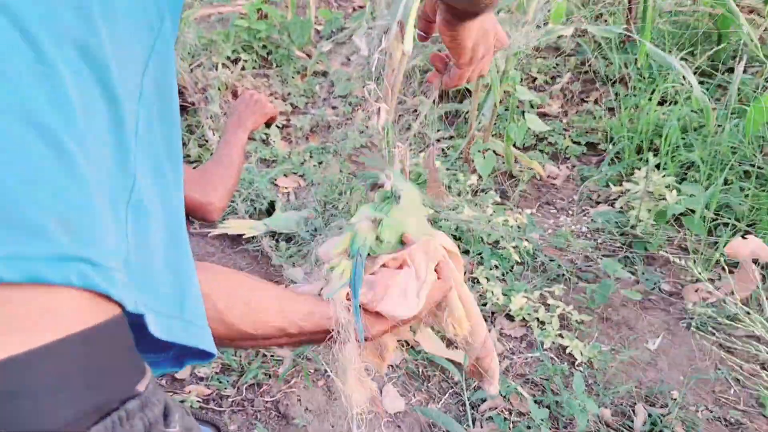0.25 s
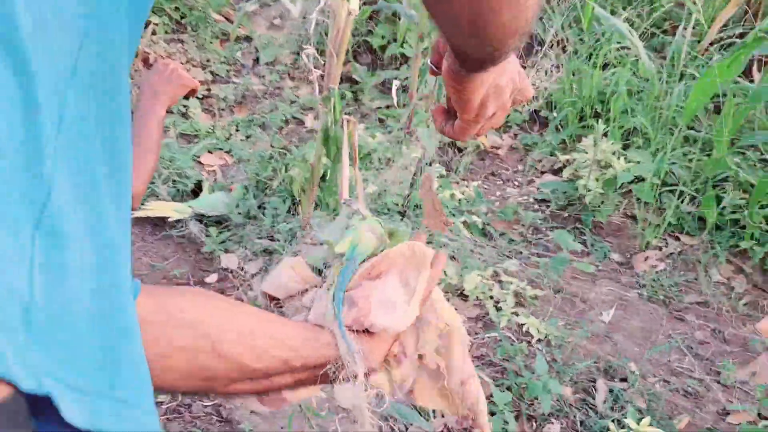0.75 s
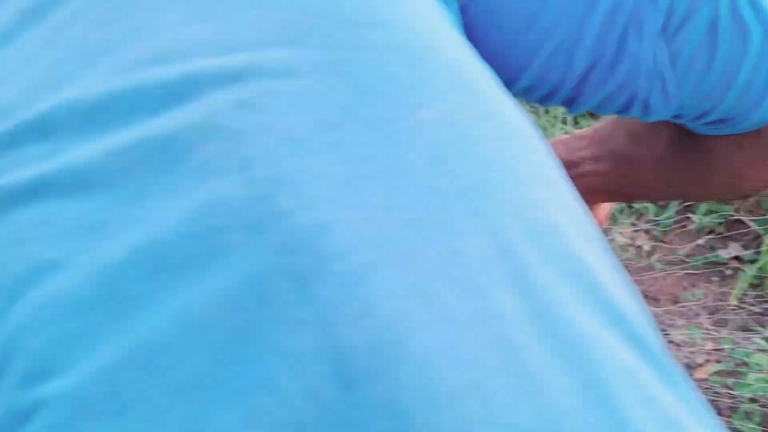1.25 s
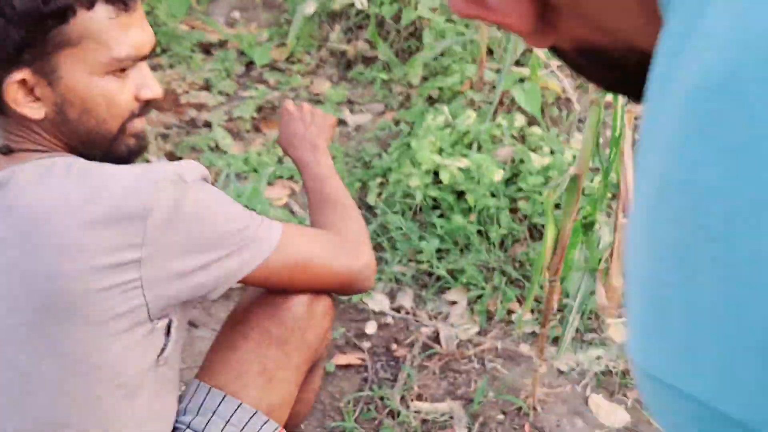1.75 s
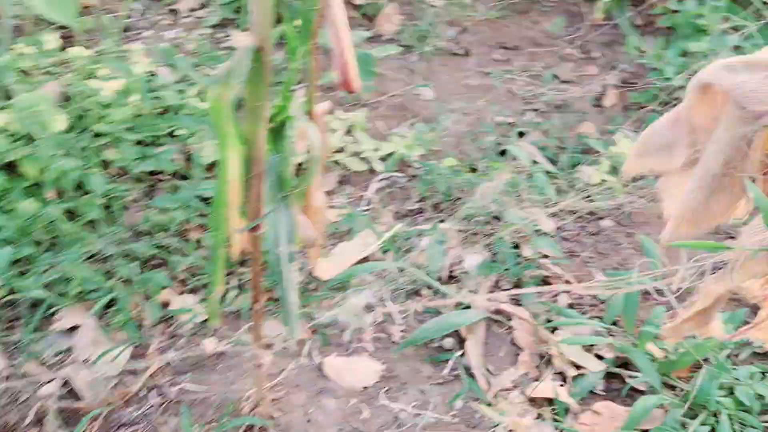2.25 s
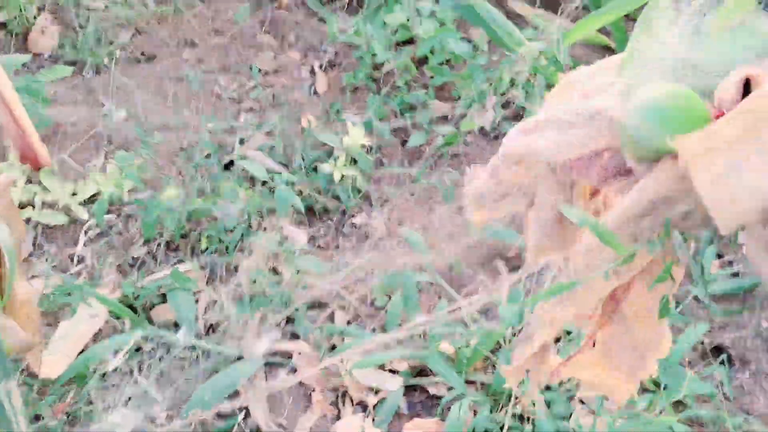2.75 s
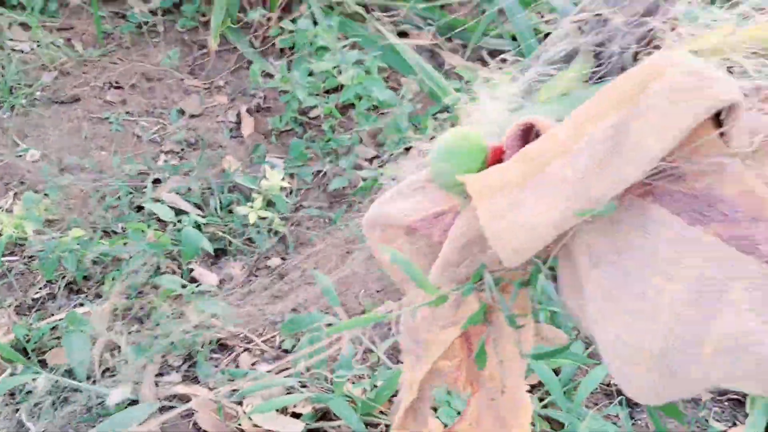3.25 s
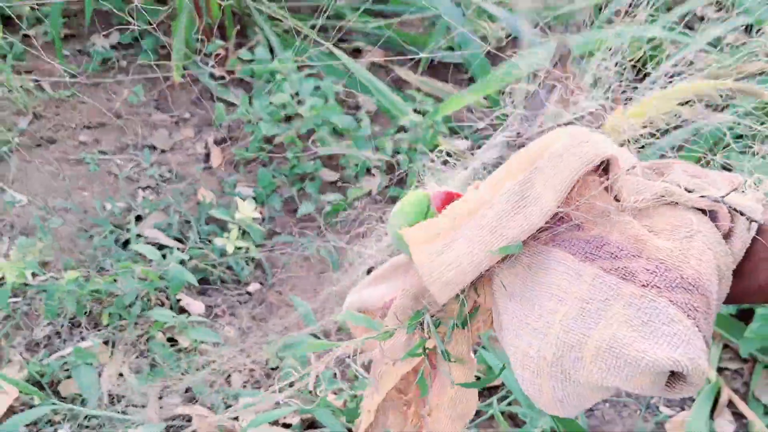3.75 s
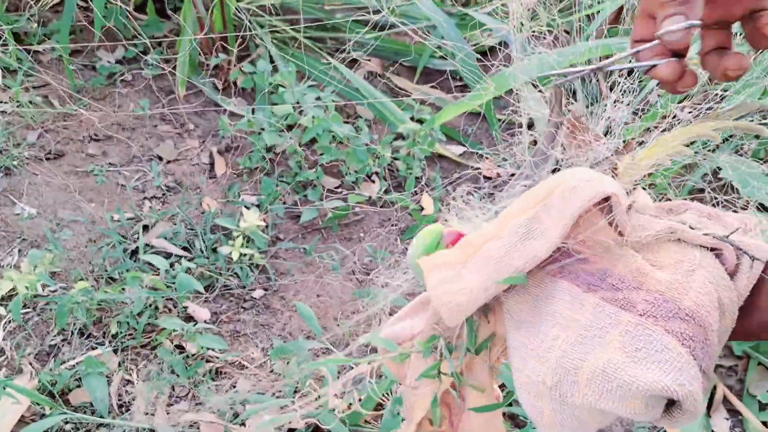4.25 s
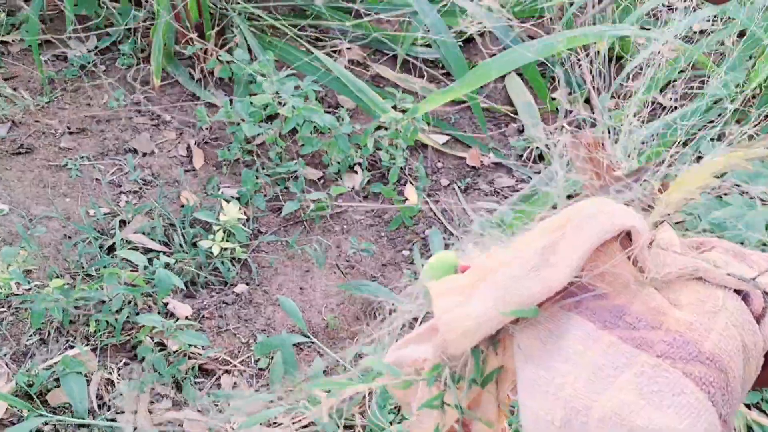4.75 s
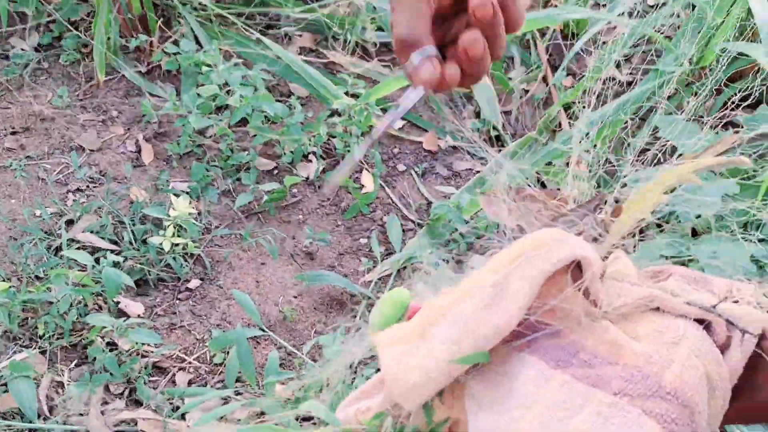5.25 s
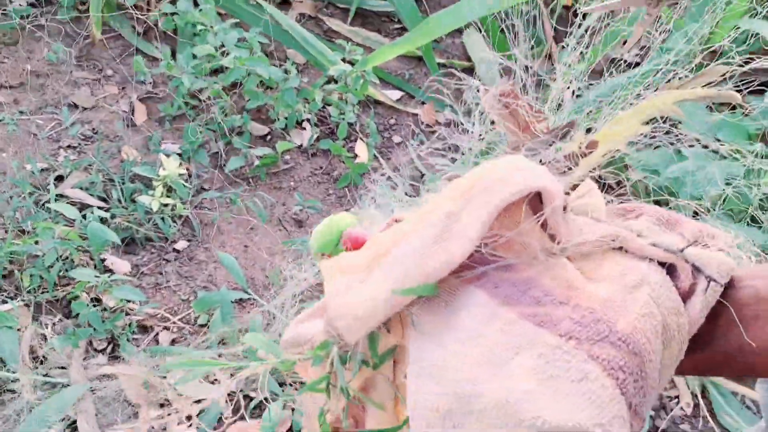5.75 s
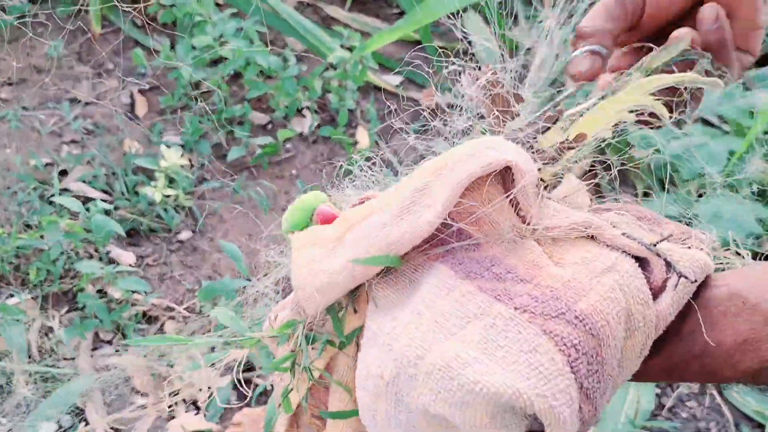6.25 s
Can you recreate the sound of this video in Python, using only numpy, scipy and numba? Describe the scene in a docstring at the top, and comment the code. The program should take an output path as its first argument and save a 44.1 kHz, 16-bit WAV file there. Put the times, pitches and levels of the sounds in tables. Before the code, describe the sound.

Close, dry outdoor sound: a clipped end of a screech, then nine full grating parakeet calls, roughly two every one and a half seconds, growing brighter and fiercer in the middle. Between them come quiet crackles of leaves and cloth, small ticks, dull handling thumps and slight wind rumble, with a barely audible insect trill and distant coos. The final screech is followed by rustling and snaps.

```python
"""A parakeet held in a cloth screeches ten times in a crop field, close to a hand-held stereo microphone.
Its syrinx vibrates in short bursts about a hundred times a second, ringing five windpipe and beak
resonances over a low rasp. Behind it: resonant grains rustle as leaves and netting, noise snaps tick,
fingers knock the housing as short low swells, a narrow low hum wavers, wind noise stirs the ports,
an insect trills as throbbing narrow noise and a far bird coos in falling sines, over a far hiss."""
import sys
import numpy as np
from scipy import signal
from scipy.fft import rfft, irfft, next_fast_len
from scipy.io import wavfile
from scipy.ndimage import uniform_filter1d, map_coordinates
from numba import njit

SR = 44100
rng = np.random.default_rng(int(sys.argv[2]) if len(sys.argv) > 2 else 0)


def store_pcm(level_fs):
    """Save levels as 16-bit WAV."""
    pcm = np.round(np.clip(level_fs, -1, 1) * 32767).astype(np.int16)
    wavfile.write(sys.argv[1], SR, np.atleast_2d(pcm).T)


def volts_from_db(level):
    """Convert decibel levels to linear amplitude ratios."""
    exponent = np.asarray(level, float) / 20
    return 10 ** exponent


N = 286209

# Far hiss spectrum. Each row: frequency in Hz, relative density in dB per Hz.
FIELD_SPECTRUM = [(59, -40), (100, -24), (153, -27.5), (300, -30.5), (480, -43.5), (1480, -41),
                  (5770, -36.5), (7450, -34.5), (8280, -42), (10000, -38), (13500, -39.5), (16000, -40)]
# Likeness of the hiss at the two ports. Each row: frequency in Hz, likeness (clipped to 0-1).
FIELD_LIKENESS = [(60, -1.5), (240, 1), (950, 1), (3770, -0.6), (15000, -0.03)]
FIELD_DB = -61.5

# Hum level. Each row: time in seconds, level in dB.
HUM_LEVEL = [(0.0, -41), (0.11, -69), (0.25, -42), (0.32, -68), (0.58, -58), (0.98, -62), (1.25, -44),
             (1.3, -81), (1.46, -41.5), (1.64, -57), (2.24, -50), (2.29, -62.5), (3.25, -66.5),
             (3.43, -52.5), (5.17, -54), (5.19, -48.5), (6.4, -60.5), (6.49, -58)]
HUM_HZ, HUM_WIDTH_HZ = 72, 14
# Gusts on the ports. Each row: time in seconds, level in dB before the lumps.
WIND_LEVEL = [(0.0, -39), (0.07, -59.5), (1.79, -56), (2.96, -82), (3.54, -58), (3.69, -65), (6.44, -63),
              (6.49, -52)]

# Far bird. Each row: start in seconds, length in seconds, first pitch in Hz, level in dB at mid-note.
COOS = [(0.072, 0.046, 877, -60), (1.313, 0.038, 950, -66), (1.35, 0.07, 914, -65)]
COO_FALL_HZ_PER_S = 610
INSECT_HZ, INSECT_WIDTH_HZ, INSECT_DB, TRILLS_PER_S = 7500, 160, -71, 6.5   # level at the top of a throb

# Leaves, cloth and net, one list for each pause of the bird. Each row: time in seconds, level in dB.
RUSTLE_LEVEL = [
    [(0.11, -55), (0.192, -54), (0.2, -56)],
    [(0.66, -49.5), (0.67, -59), (0.79, -58)],
    [(1.3, -53.5), (1.398, -90), (1.45, -48.5)],
    [(1.93, -60.5), (2.056, -52), (2.075, -50)],
    [(2.62, -61), (2.708, -49.5), (2.73, -56.5)],
    [(3.13, -74), (3.136, -80), (3.28, -84.5)],
    [(3.78, -67.5), (3.812, -78), (3.91, -90)],
    [(4.34, -65), (4.53, -72)],
    [(4.94, -66), (5.336, -82), (5.5, -77.5)],
    [(6.08, -68), (6.206, -57.5), (6.24, -56)],
    [(6.27, -58), (6.442, -70), (6.49, -57.5)],
]
# Rustle colouring. Each row: frequency in Hz, relative gain in dB.
LEAF_SPECTRUM = [(180, -43.5), (300, -18.5), (1560, -17.5), (2210, -8), (3830, -8), (4990, -7.5),
                 (8790, -9), (12500, -17.5), (16000, -38)]
# Stalk and net snaps. Each row: start in seconds, peak in dB before panning, pitch in Hz,
# left against right in dB.
TICKS = [(0.648, -26, 6680, -6), (1.438, -50, 3380, -19), (1.987, -49.5, 2470, -10), (3.183, -42, 650, -10),
         (6.199, -40.5, 5500, -9), (6.258, -27.5, 2280, -6.5), (6.295, -45.5, 4960, -31.5)]
# Fingers on the housing. Each row: start in seconds, drive in dB before panning, pitch in Hz,
# left against right in dB.
THUMPS = [(0.365, -43, 108, -15), (0.491, -41, 103, -16), (0.597, -37, 89.2, -26), (0.932, -43.5, 95, 21),
          (1.077, -39, 144, -1), (1.778, -41, 99, 16), (2.292, -42, 111, -8), (3.685, -39, 109.2, 1.5),
          (4.804, -35, 237, 3), (5.9, -41, 110.6, -7.5)]

# Screeches. Each row: start in seconds, end in seconds, lead of the left port in ms below the notch,
# lead in ms above it, phase turn above it in radians.
SCREECHES = [(-.03, .092, .2, .495, -1.19), (.21, .636, .2, .345, .94), (.803, 1.278, 0, .33, 1.87),
             (1.462, 1.903, -.1, .125, 2.61), (2.083, 2.585, 0, .205, .78), (2.736, 3.103, .06, .25, 1.4),
             (3.288, 3.753, .12, .165, -1.49), (3.92, 4.315, .1, .1, -1.07), (4.536, 4.906, .1, .115, -.99),
             (5.518, 6.048, .12, .26, 2.52)]
# Syrinx, a row a screech. Each row: wait for the first burst in periods, then bursts per second
# at the start, a third, two thirds and the end.
BURSTS = [(0.71, 100.5, 100.5, 100.5, 100.5), (0.06, 113.1, 112.5, 114.4, 106.2),
          (0.74, 116.2, 101.5, 109.2, 104.9), (0.38, 107.7, 109.6, 101.1, 106.6),
          (0.51, 102.1, 103.1, 101.5, 92.1), (0.59, 80.1, 105.0, 95.7, 134.5),
          (0.63, 95.6, 98.3, 97.1, 100.1), (0.1, 109.1, 99.0, 94.2, 91.9), (0.26, 104.9, 101.6, 97.7, 94.7),
          (1.0, 101.8, 92.0, 102.7, 89.2)]
# Effort, a list a screech. Each row: time in seconds, main resonance (2) in dB, its centre in Hz.
EFFORT = [
    [(0.004, -21, 2710), (0.07, -25, 2767)],
    [(0.23, -28, 2774), (0.33, -30, 3140), (0.49, -23.5, 3300), (0.56, -25, 3266), (0.61, -34, 2780)],
    [(0.82, -31.5, 2770), (0.912, -28, 3090), (1.015, -28, 3070), (1.03, -26, 2846), (1.13, -25.5, 3073),
     (1.16, -28.5, 2764), (1.255, -29, 2990)],
    [(1.485, -27, 2750), (1.553, -25, 2813), (1.717, -19.5, 2870), (1.813, -19.5, 2900),
     (1.875, -24.5, 2706)],
    [(2.1, -25.5, 2700), (2.166, -16.5, 2785), (2.382, -19, 2772), (2.482, -19, 2685), (2.532, -19, 2680),
     (2.56, -23, 2884)],
    [(2.76, -18.5, 2670), (2.766, -14.5, 2717), (2.894, -14.5, 2780), (3.016, -21, 2590),
     (3.072, -20.5, 2630), (3.08, -22, 2510)],
    [(3.315, -30.5, 2360), (3.348, -24.5, 2565), (3.73, -25, 2490)],
    [(3.94, -27, 2445), (3.966, -20.5, 2645), (4.064, -18.5, 2650), (4.138, -25, 2473), (4.29, -26, 2573)],
    [(4.56, -24.5, 2490), (4.636, -15.5, 2672), (4.72, -16.5, 2590), (4.788, -25.5, 2510),
     (4.848, -22, 2527), (4.875, -32.5, 2690)],
    [(5.55, -39, 2450), (5.576, -26.5, 2466), (5.756, -25, 2504), (5.89, -16, 2620), (6.014, -20, 2654),
     (6.02, -27, 2403)],
]
# Upper voice as the beak opens and the head turns, a list a screech. Each row: time in seconds,
# resonance 3 in Hz, resonances 3, 4 and 5 in dB, breath hiss in dB.
HIGHS = [
    [(0.01, 4380, -29.5, -41.5, -37.5, -45), (0.04, 4410, -27.5, -43.5, -48, -59),
     (0.07, 4440, -26.5, -38, -55.5, -51)],
    [(0.23, 4580, -34, -44, -45, -50.5), (0.33, 4840, -27.5, -42, -41, -53.5),
     (0.42, 4830, -33.5, -37, -43.5, -49.5), (0.51, 4600, -28, -31.5, -39.5, -44.5),
     (0.6, 4130, -28.5, -36.5, -37.5, -54)],
    [(0.82, 4500, -27.5, -28, -36.5, -50), (0.93, 4600, -23.5, -30.5, -37.5, -41),
     (1.03, 4490, -28, -28, -47.5, -50), (1.12, 4400, -36.5, -34.5, -44, -60),
     (1.25, 4440, -36, -42.5, -53.5, -66.5)],
    [(1.49, 4310, -40, -39.5, -39, -61), (1.58, 4420, -32, -33.5, -39.5, -55.5),
     (1.68, 4380, -41, -36, -36.5, -54), (1.78, 4450, -32, -32, -37.5, -48.5),
     (1.88, 4170, -40, -35, -33.5, -60.5)],
    [(2.12, 3750, -29.5, -23, -24.5, -47.5), (2.23, 3730, -24, -22.5, -22, -41),
     (2.33, 3850, -26, -26, -27, -41), (2.44, 4040, -24.5, -33.5, -22.5, -49.5),
     (2.56, 4080, -19, -29, -25, -45.5)],
    [(2.77, 4400, -25, -31, -28, -52.5), (2.84, 4380, -23.5, -24.5, -23, -52),
     (2.92, 3730, -27, -28, -25, -47), (3.0, 3790, -25.5, -27, -32.5, -45),
     (3.08, 3950, -33.5, -38, -40.5, -56)],
    [(3.31, 3580, -35.5, -35.5, -38.5, -53.5), (3.42, 3670, -27.5, -26.5, -34, -42),
     (3.52, 3950, -25, -23, -39, -46.5), (3.62, 4050, -24, -27.5, -45, -48.5),
     (3.73, 4060, -27.5, -34, -55, -54)],
    [(3.94, 3770, -33, -30.5, -32, -58), (4.03, 3990, -31.5, -26.5, -34, -46.5),
     (4.12, 3980, -36.5, -34, -33, -63), (4.2, 3740, -30, -31.5, -51.5, -44),
     (4.29, 3740, -27, -44, -61, -46)],
    [(4.57, 3670, -28.5, -28.5, -33.5, -49), (4.64, 3750, -27, -21.5, -37.5, -44),
     (4.72, 3680, -29.5, -24, -38.5, -51.5), (4.8, 3610, -26.5, -29.5, -40.5, -66.5),
     (4.88, 3600, -30.5, -41, -49, -61.5)],
    [(5.55, 3640, -42.5, -44.5, -53.5, -58), (5.67, 3530, -29.5, -41, -64, -47.5),
     (5.79, 3610, -27.5, -30.5, -35.5, -50), (5.9, 3760, -26, -29, -28.5, -39),
     (6.01, 3780, -30, -41, -40.5, -49.5)],
]
# Windpipe and beak, a row a screech. Each row: resonances 1, 4 and 5 in Hz at mean effort,
# share by which resonance 1 sinks from start to end (the final sag comes on top).
THROATS = [(1340, 1800, 4400, 0.033), (1670, 7300, 7730, 0.12), (1600, 5950, 8100, 0.33),
           (1370, 8600, 6300, 0.39), (1310, 5680, 6800, 0.036), (1321, 6200, 7030, 0.076),
           (1186, 5450, 5900, 0), (1210, 5820, 6600, 0.07), (1220, 6130, 6900, 0.011),
           (1184, 5300, 6300, 0.0066)]
# Low rasp, a row a screech. Each row: steady level in dB, change in dB as the voice stops (the croak).
RASPS = [(-64, -25), (-56.5, -6), (-55, -38.5), (-59.5, 19.5), (-52.5, 23), (-47.5, 10.5), (-47.5, 6),
         (-49, 19.5), (-49, 12.5), (-47, 16)]
# One value a screech: resonance 1 in dB at mean effort.
RESONANCE_1_DB = [-37.5, -36, -41, -34.5, -30, -30, -36, -34.5, -35, -32.5]
# One value a screech: ragged share at its start, 0-1.
RAGGED_SHARE = [.2, .27, .25, .17, .17, .09, .23, .15, .12, .13]
# One value a screech: sound between the bursts, in dB against a full burst, before its flicker.
LEAK_DB = [-19, -14, -18, -18, -20, -25, -20, -22, -25, -27]
# One value for the rasp and each of resonances 1-5: spread of the side tones in Hz.
SPREAD_HZ = [250, 260, 520, 850, 800, 1000]
# Same order: factor on the ragged share of the screech.
RAGGED_FACTOR = [5.5, 1.6, .9, 2.8, 2.8, 3.2]
# Same order: exponent on the burst; low tones fill more of each burst than high ones.
SHARPNESS = [1.1, 1.0, 1.45, 1.6, 1.6, 1.6]
# Breath hiss above the resonances. Each row: frequency in Hz, relative density in dB per Hz.
AIR_SPECTRUM = [(7000, -18.5), (8000, 2), (9300, 1.5), (10600, -2.5), (12100, -2), (13900, -6.5),
                (16000, -7.5)]
# Turbulence filling the valleys between resonances. Each row: frequency in Hz, relative density in dB per Hz.
GRIT_SPECTRUM = [(800, -11), (1100, -3.5), (1550, -11), (2200, -3.5), (4700, -4.5), (6400, -3),
                 (8000, -12.5)]
GRIT_DB, GRIT_APART = -7.5, .8   # against the mean dB of resonances 3 and 4; gain of each port's own grit
RASP_HZ, CROAK_S = 800, 0.012   # rasp centre before the sag; time constant of the croak
ATTACK_S, ATTACK_DB, RELEASE_S, RELEASE_DB = 0.02, 23, 0.019, 29.5
FOLLOW_RASP, FOLLOW_LOW = 0.13, 0.54   # share of the main resonance's dB swing in the rasp, resonance 1
HIGHS_LIFT = .5   # exponent with which resonances 4 and 5 follow the main glide
WAVER_DB, WAVERS_PER_S = 1.5, 12.33   # each resonance swells and sinks on its own
NOTCH_HZ = 1550   # sound bent round the housing cancels here; above it the left port is turned in phase

# Cloth, hands, ground and plants. Each row: left delay in ms, left gain in dB, right delay in ms,
# right gain in dB, both gains before dulling.
ECHOES = [(.37, -9, .58, -9), (1.3, -12, .95, -12), (4.6, -19, 5.3, -20), (11, -27, 13, -26),
          (23, -36, 19, -35), (57, -44, 63, -45)]
# Shading by the housing. Each row: frequency in Hz, left against right in dB.
PORT_SHADE = [(60, -3), (150, -7), (650, -4.5), (1550, 6.5), (2050, 4.5), (2450, -12), (3200, -2.5),
              (4000, -6), (5980, 0), (15000, -2.5)]


def rms_one(x):
    """Scale to rms 1."""
    return x / np.sqrt(np.mean(x ** 2) + 1e-20)


def evened(x, size):
    """Divide out the slow level."""
    power = uniform_filter1d(uniform_filter1d(x ** 2, size), size)
    return x / np.sqrt(power + 1e-20)


def in_time(rows):
    """Columns of a curve, one value per sample."""
    s, *columns = np.transpose(rows)
    return [np.interp(np.arange(N) / SR, s, c) for c in columns]


def at_hz(points, hz):
    """Read a spectrum on a log-frequency axis."""
    points = np.array(points, float)
    return np.interp(np.log(hz + 1), np.log(points[:, 0] + 1), points[:, 1])


def drift(per_s, size):
    """Slow chance: straight lines between random points; spread about 1."""
    knots = rng.standard_normal(int(size * per_s / SR) + 2)
    return np.interp(np.arange(size) * per_s / SR, np.arange(len(knots)), knots) * 1.2


def coloured(x, spectrum):
    """Filter by a spectrum, nothing outside its ends; rms 1."""
    hz = np.arange(x.shape[-1] // 2 + 1) * SR / x.shape[-1]
    inside = (hz > spectrum[0][0]) & (hz < spectrum[-1][0])
    return rms_one(irfft(rfft(x) * volts_from_db(at_hz(spectrum, hz)) * inside, x.shape[-1]))


def panned(db, pan_db):
    """Left and right gains pan_db apart."""
    return volts_from_db([[db + pan_db / 2], [db - pan_db / 2]])


@njit
def resonate(x, hz, width_hz, sr):
    """Two-pole resonance whose centre may move."""
    out, r = np.zeros(len(x)), np.exp(-np.pi * width_hz / sr)
    for i in range(2, len(x)):
        fed = x[i] - x[i - 2]
        out[i] = fed + 2 * r * np.cos(2 * np.pi * hz[i] / sr) * out[i - 1] - r * r * out[i - 2]
    return out


def narrow_noise(hz, width_hz, widening):
    """White noise through two resonances in a row, the second wider by a factor."""
    once = resonate(rng.standard_normal(len(hz)), hz, width_hz, SR)
    return resonate(once, hz, widening * width_hz, SR)


def field():
    """Smooth far hiss, alike in both ports in the bass only."""
    alike = np.clip(at_hz(FIELD_LIKENESS, np.arange(N // 2 + 1) * SR / N), 0, 1)
    mid, side = rfft(rng.standard_normal((2, N)))
    white = irfft(np.sqrt(1 + alike) * mid + np.sqrt(1 - alike) * side * [[1], [-1]], N)
    return volts_from_db(FIELD_DB + 2.0 * drift(4.8, N)) * coloured(white, FIELD_SPECTRUM)


def hum():
    """Narrow wavering low noise, the same in both ports."""
    tone = narrow_noise(np.full(N, float(HUM_HZ)), HUM_WIDTH_HZ, 1.8)
    return volts_from_db(in_time(HUM_LEVEL)[0]) * evened(tone, size=4000)


def wind():
    """Lumpy low wind noise, each port its own, under one level."""
    band = signal.butter(2, [22, 100], "band", fs=SR, output="sos")
    noise = signal.sosfilt(band, rng.standard_normal((2, N)))
    return volts_from_db(in_time(WIND_LEVEL)[0] + 4.5 * drift(18, N)) * rms_one(noise)


def far_bird():
    """Short near-sine coos that fall a little."""
    out = np.zeros(N)
    for s, length_s, hz, level_db in COOS:
        age_s = np.arange(round(length_s * SR)) / SR
        note = np.sqrt(2) * np.sin(2 * np.pi * (hz - COO_FALL_HZ_PER_S * age_s / 2) * age_s)
        start = round(s * SR)
        out[start:start + len(age_s)] = volts_from_db(level_db) * note * np.hanning(len(age_s))
    return out


def insect():
    """Thin high narrow noise, each port its own, throbbing together."""
    hz = np.full(N, float(INSECT_HZ))
    trill = np.array([rms_one(narrow_noise(hz, INSECT_WIDTH_HZ, 1)) for _ in range(2)])
    throb = (1 + np.sin(2 * np.pi * TRILLS_PER_S * np.arange(N) / SR + 1.0)) / 2
    return volts_from_db(INSECT_DB) * throb * trill


def rustle():
    """Uneven crackles in clumps, dealt to small resonances that come and go on their own."""
    level_db, = in_time(np.concatenate(RUSTLE_LEVEL))
    sizes = volts_from_db(4.5 * np.minimum(rng.exponential(1, (2, N)), 4)) * rng.choice([-1, 1], (2, N))
    grains_per_s = 5000 * volts_from_db(5.0 * drift(60, N))
    grains = sizes * (rng.random((2, N)) < grains_per_s / SR) + 1e-18
    dealt, out = rng.integers(0, 10, N), 0
    for k, hz in enumerate(np.geomspace(400, 14000, 10)):
        band = signal.butter(1, [hz / 1.25, hz * 1.25], "band", fs=SR)
        rung = signal.lfilter(*band, grains * (dealt == k))
        out = out + volts_from_db(4.0 * drift(30, N)) / np.sqrt(hz) * rung
    nearly_mono = out + 0.99 * out[::-1]
    return volts_from_db(level_db) * coloured(nearly_mono, LEAF_SPECTRUM)


def ticks():
    """Each snap is a few milliseconds of dying noise around its own pitch."""
    out, age_s = np.zeros((2, N + 1500)), np.arange(1500) / SR
    for s, peak_db, hz, pan_db in TICKS:
        noise = rng.standard_normal((2, 1500)) * np.exp(-age_s / .003)
        poles = [1, -1.8 * np.cos(2 * np.pi * hz / SR), .81]
        snap = 0.088 * noise + 0.1 * signal.lfilter([.1, 0, -.1], poles, noise)
        start = round(s * SR)
        out[:, start:start + 1500] += snap / np.abs(snap).max() * panned(peak_db, pan_db)
    return out[:, :N]


def thumps():
    """Soft low knocks: a sine that swells and dies in milliseconds."""
    out, age_s = np.zeros((2, N)), np.arange(2000) / SR
    for s, drive_db, hz, pan_db in THUMPS:
        knock = np.sin(2 * np.pi * hz * age_s) * age_s / 0.0072 * np.exp(1 - age_s / 0.0029)
        start = round(s * SR)
        out[:, start:start + 2000] += knock * panned(drive_db, pan_db)
    return out


def syrinx(bursts, spent):
    """Membranes start and stop once a burst: swell, burst number, seconds from mid-burst."""
    (delay, *rates), size = bursts, len(spent)
    per_s = np.polyval(np.polyfit([0, 1 / 3, 2 / 3, 1], rates, 3), spent)   # smooth curve through four rates
    burst = np.cumsum(per_s / SR) - delay + .014 * drift(40, size)
    which = np.floor(burst + .5).astype(int) + 1
    turn = 2 * np.pi * burst
    # quick swell, slower fall
    swell = np.exp(np.cos(turn + .45 * np.cos(turn) - .2) - 1) * volts_from_db(.6 * drift(100, size))
    return swell, which, (burst + 1 - which) / per_s


def side_tones(hz, spread_hz, since_s):
    """An uneven burst is still much like its neighbours: seven slowly wandering tones."""
    size, out = len(since_s), 0
    for offset in np.linspace(-1.1, 1.1, 7) + rng.normal(0, .12, 7):
        side_hz = hz + spread_hz * (offset + .08 * drift(5, size))
        level = volts_from_db(3.0 * drift(8, size) - 3.5 * offset ** 2)
        out = out + level * np.sin(2 * np.pi * side_hz * since_s + .8 * drift(22, size) + 6 * offset)
    return out


def ringing(k, hz, swell, which, since_s, leak, ragged_share):
    """Rasp (k = 0) or resonance k, struck anew by every burst; level evened."""
    gate = swell ** SHARPNESS[k]
    share = np.clip(ragged_share * RAGGED_FACTOR[k], 0, .95)
    detune, slip = rng.standard_normal((2, 100))[:, which]
    # each restart is much like the one before, bending a little upward
    cycles = hz * since_s * (1 + .005 * detune + 3.0 * since_s)
    tone = np.sqrt(2) * np.sin(2 * np.pi * cycles + 1.8 * share * slip)
    hiss = evened(narrow_noise(hz, SPREAD_HZ[k], 2), size=600)
    sides = evened(side_tones(hz, SPREAD_HZ[k], since_s), size=3000)
    ragged = .9 * sides + (.25 if k else 1.2) * hiss   # the low rasp is mostly breath
    ring = gate * (np.sqrt(1 - share) * tone + np.sqrt(share) * ragged) + leak * hiss
    return evened(ring, size=900)


def at_ports(sound, low_lead_ms, high_lead_ms, turn_rad):
    """Left port shifted in time and phase against the right, as the holding hand sways."""
    n = len(sound)
    size = next_fast_len(n + 200)
    hz = np.arange(size // 2 + 1) * SR / size
    above = 1 / (1 + np.exp((NOTCH_HZ - hz) / 70))
    low = np.exp(2j * np.pi * hz * low_lead_ms / 1000)
    high = np.exp(1j * (2 * np.pi * hz * high_lead_ms / 1000 + turn_rad))
    left = irfft(rfft(sound, size) * ((1 - above) * low + above * high), size)
    swayed = np.arange(n) + .02 * drift(9, n) * SR / 1000
    return np.array([map_coordinates(left, [swayed], order=3), sound])


def screech(call, bursts, effort, highs, throat, low_db, rasp, ragged_share, leak_db):
    """Bursts of the syrinx ring rasp and resonances, with breath hiss and grit; stereo."""
    start, end, *port_shift = call
    t = np.arange(max(start, 0) * SR, end * SR).astype(int)
    size, t_s = len(t), t / SR
    main_db, f2 = [c[t] for c in in_time(effort)]
    f3, db3, db4, db5, air_db = [c[t] for c in in_time(highs)]
    spent = (t - t[0]) / size
    swell, which, since_s = syrinx(bursts, spent)
    leak = volts_from_db(leak_db + 2.0 * drift(300, size))
    ragged_share = ragged_share * (1 + 1.6 * spent ** 2)   # the voice frays as the breath runs out

    strain = f2 / f2.mean()   # more effort lifts resonance 1 along with the main one, resonances 4 and 5 less
    f1 = throat[0] * strain * (1 - throat[3] * (spent - .5))
    f4, f5 = [hz * strain ** HIGHS_LIFT for hz in throat[1:3]]
    # the slack membranes drop in pitch as the call stops
    sag = 1 - .45 * np.exp((t - t[-1]) / (.018 * SR))
    centres_hz = [RASP_HZ * sag, f1 * (3 + sag) / 4, f2, f3, f4, f5]

    swing_db = main_db - main_db.mean()
    croak = np.minimum(np.exp((t_s - end + RELEASE_S) / CROAK_S), 1)
    rasp_db = rasp[0] + FOLLOW_RASP * swing_db + rasp[1] * croak
    levels_db = [rasp_db, low_db + FOLLOW_LOW * swing_db, main_db, db3, db4, db5]

    air = coloured(rng.standard_normal(size), AIR_SPECTRUM)
    out = volts_from_db(air_db) * evened((swell ** SHARPNESS[-1] + leak) * air, size=900)
    for k, (hz, level_db) in enumerate(zip(centres_hz, levels_db)):
        ring = ringing(k, hz, swell, which, since_s, leak, ragged_share)
        out = out + volts_from_db(level_db + WAVER_DB * drift(WAVERS_PER_S, size)) * ring

    grit_level = volts_from_db((db3 + db4) / 2 + GRIT_DB) * evened(swell ** SHARPNESS[2] + 2 * leak, size=900)
    grit = coloured(rng.standard_normal((3, next_fast_len(size))), GRIT_SPECTRUM)[:, :size]
    shared, *apart = grit_level * grit

    # steep onset and stop
    attack_db = -ATTACK_DB * np.clip(1 - (t_s - start) / ATTACK_S, 0, 1)
    release_db = -RELEASE_DB * np.clip(1 - (end - t_s) / RELEASE_S, 0, 1)
    edges = volts_from_db(attack_db + release_db)
    no_bass = signal.butter(2, 480, "high", fs=SR, output="sos")   # a small throat radiates no bass
    out = edges * signal.sosfilt(no_bass, out + shared)
    return t, at_ports(out, *port_shift) + GRIT_APART * edges * np.array(apart)


def parakeet():
    """All screeches with a few dull echoes on each side, shaded between the two ports."""
    voice = np.zeros((2, N))
    for call in zip(SCREECHES, BURSTS, EFFORT, HIGHS, THROATS, RESONANCE_1_DB, RASPS,
                    RAGGED_SHARE, LEAK_DB):
        t, sound = screech(*call)
        voice[:, t] = sound
    heard = voice.copy()
    dull = signal.lfilter([.6], [1, -.4], voice)
    for echo in ECHOES:
        for side in range(2):
            delay_ms, gain_db = echo[2 * side:2 * side + 2]
            lag = int(delay_ms * SR / 1000)
            heard[side, lag:] += volts_from_db(gain_db) * dull[side, :-lag]
    size = next_fast_len(N)
    hz = np.arange(size // 2 + 1) * SR / size
    shade = volts_from_db(at_hz(PORT_SHADE, hz) * [[.5], [-.5]])
    return irfft(rfft(heard, size) * shade, size)[:, :N]


def scene():
    """Everything at the two ports."""
    background = field() + hum() + wind() + far_bird() + insect()
    return background + rustle() + ticks() + thumps() + parakeet()


def top_cut(x):
    """Nothing passes above the cut-off."""
    return signal.sosfilt(signal.butter(12, 16510, fs=SR, output="sos"), x)


def record(dry):
    """The microphone rounds the highest peaks."""
    rounded = dry / (1 + (np.abs(dry) / .92) ** 4) ** .25
    return top_cut(rounded)


dry = scene()
out = record(dry)
store_pcm(out)
```